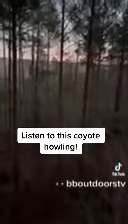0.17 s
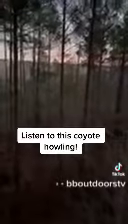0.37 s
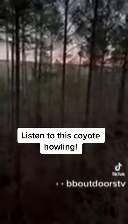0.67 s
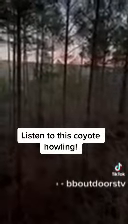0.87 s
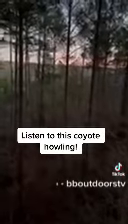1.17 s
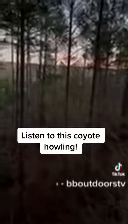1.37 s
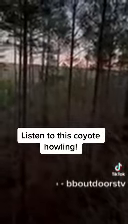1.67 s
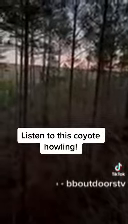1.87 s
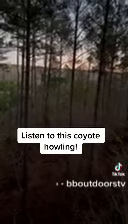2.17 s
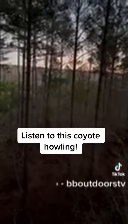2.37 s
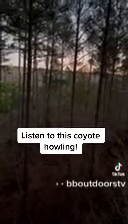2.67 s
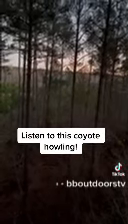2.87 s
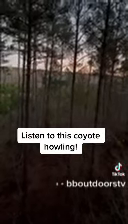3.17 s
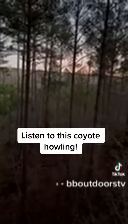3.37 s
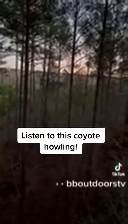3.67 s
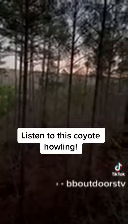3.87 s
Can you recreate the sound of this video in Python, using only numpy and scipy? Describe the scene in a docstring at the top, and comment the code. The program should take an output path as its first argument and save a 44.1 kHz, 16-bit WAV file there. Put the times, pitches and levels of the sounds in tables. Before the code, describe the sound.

A coyote holds one long, falling howl in a quiet forest, with faint bird chirps.

```python
"""A pine forest at dusk. A coyote holds one long howl, a stack of harmonics on an unsteady pitch:
a high note that breaks down to a lower register, then sinks and fades. Trunks scatter the voice
and the woods ring on behind it. Small birds chip, slur and lisp in quick, wavering sine tones.
Underneath lies a faint bed of low rumble and hiss, with a few soft, leafy rustles."""
import sys
import numpy as np
from scipy import signal
from scipy.fft import rfft, irfft, next_fast_len
from scipy.io import wavfile
from scipy.ndimage import map_coordinates

SR = 44100
rng = np.random.default_rng(int(sys.argv[2]) if len(sys.argv) > 2 else 0)


def inscribe(sig):
    """Save sig as 16-bit PCM at rate SR to the path in sys.argv[1].

    A 1-D sig is mono; a 2-D sig holds one channel per row.
    Samples are clipped to [-1, 1] before scaling.
    """
    pcm = np.round(np.clip(np.atleast_2d(sig).T, -1, 1) * 32767)
    wavfile.write(sys.argv[1], SR, pcm.astype(np.int16))


N = 176400

WOODS_DECAY = [(300, 0.41), (700, 3.43), (1500, 2.1), (2300, 2.22), (4000, 0.19), (8000, 0.6)]  # ring of the woods: f/Hz, T60/s

HOWL_PITCH = [(0.0, 749.7), (0.15, 776), (0.25, 759), (0.35, 774), (0.42, 750.5), (0.75, 731.7),
              (0.95, 744.0), (1.15, 741.4), (1.3, 749.4), (1.41, 749.1), (1.47, 731.3), (1.528, 708.9),
              (1.542, 646), (1.75, 622.2), (1.95, 616.1), (2.2, 595.2), (2.48, 582.3), (2.72, 545.3),
              (3.0, 528.7), (3.25, 486.5), (3.45, 472.5), (3.55, 477.2), (3.68, 486.8), (3.8, 481.0),
              (4.0, 479.4)]  # the howl's melody: t/s, f/Hz
HOWL_JITTER = [(0, .0045), (.4, .004), (.6, .0012), (2, .0014), (3, .0025), (3.3, .006), (3.6, .0018),
               (4, .0012)]  # unsteadiness: t/s, depth/share of the pitch
HOWL_FLUTTER = [(0, 3.4), (.52, 3), (.65, 1.2), (1.4, 1), (1.7, .4), (2.35, .4), (2.55, 1.5), (3.05, .9),
                (3.27, 2.4), (3.55, .6)]  # fast level flutter of the harmonics, at full depth on the odd ones: t/s, depth/dB
# envelopes of the six lowest harmonics: t/s, level/dB
HARMONIC_1 = [(0, -65), (.66, -67), (.88, -79), (1.02, -54.5), (1.16, -67), (1.25, -55), (1.42, -66),
              (1.56, -44.5), (1.7, -38), (1.84, -42), (1.94, -41), (2.12, -46), (2.31, -39.5), (2.41, -46),
              (2.65, -51), (3.2, -55), (3.4, -62), (4, -70)]
HARMONIC_2 = [(0, -46.5), (1.1, -46.5), (1.25, -52), (1.5, -47), (1.95, -45.5), (2.17, -56), (2.29, -60),
              (2.42, -50), (2.93, -51), (3, -57), (3.11, -46), (3.28, -56), (3.5, -50.5), (3.78, -59),
              (4, -61)]
HARMONIC_3 = [(0, -53.5), (.28, -63), (0.579, -46.5), (1.151, -53), (1.501, -50.5), (2.05, -55.5),
              (2.199, -57), (2.68, -65.5), (2.85, -61.5), (3.12, -61.5), (3.23, -78), (4, -81)]
HARMONIC_4 = [(0, -105), (1.518, -105), (1.639, -72), (2.099, -72.5), (2.35, -84.5), (2.55, -71.5),
              (2.72, -61.5), (3.199, -76), (4, -75.5)]
HARMONIC_5 = [(0, -79), (.36, -79), (0.6, -85), (1.252, -82.5), (1.597, -112), (2.5, -112), (2.72, -81.5),
              (3, -104)]
HARMONIC_6 = [(0, -73), (.36, -73), (.6, -94), (1.7, -93), (2.2, -108)]
SHEEN_ENVELOPE = [(0, -99), (.4, -98.5), (1.4, -104), (1.6, -120)]  # faint top overtones of the high note: t/s, level/dB
SHEEN_HARMONICS = [(7, -7), (10, 2), (11, 5), (13, 1), (14, -1.5)]  # their balance: harmonic number, offset/dB
RASP_ENVELOPE = [(.5, -97), (.6, -72.5), (.68, -79.5), (.84, -72), (.92, -105)]  # roughness between harmonics 2 and 3: t/s, level/dB

RUMBLE_EQ = [(20, -39.5), (40, -12.5), (68, -3.5), (105, -8), (160, -15), (300, -22.5), (600, -18),
             (1200, -40.5), (3000, -59)]  # colour of the rumble: f/Hz, relative level/dB
RUMBLE_ENVELOPE = [(0, -73.5), (1.3, -74), (1.65, -73), (1.9, -73.5), (2.6, -76.5), (3.6, -72.5), (4, -74)]  # its slow drift: t/s, level/dB
RUMBLE_BUMPS = [(1.59, -85.5), (1.66, -73), (1.75, -73), (1.87, -72.5), (3.8, -94)]  # soft bumps in it: t/s, level/dB
HISS_EQ = [(100, -2.5), (500, -3), (800, -4.5), (1200, -7.5), (3000, -26.5), (3700, -9), (5000, -14.5),
           (7000, -13), (8200, -19.5), (9000, -25), (10000, -20), (13500, -27)]  # colour of the steady hiss: f/Hz, relative level/dB
MID_HISS_EQ = [(400, -13.5), (900, 5.5), (1400, 2.5), (2200, -8), (3200, -13.5), (5000, -23.5), (8000, -30)]  # colour of the midrange hiss: f/Hz, relative level/dB
MID_HISS_ENVELOPE = [(0, -84.5), (1.3, -87), (1.7, -99.5), (2.4, -92), (2.9, -78.5), (3.25, -80.5),
                     (4, -78.5)]  # its dip and swell: t/s, level/dB

CHIP_CUES = [(.032, -59, 6120), (0.426, -63.5, 6790), (1.61, -64.5, 6270), (2.124, -67.5, 6590),
             (2.746, -58.5, 5970), (3.257, -54.5, 6200), (3.794, -52, 6000)]  # sharp bird chips: t/s, dry peak level/dB, bottom f/Hz
SLUR_CUES = [(.09, -84, 6050), (.3, -84, 5850), (.715, -85.5, 5520), (1.99, -87.5, 6080)]  # falling bird notes: t/s, dry peak level/dB, starting f/Hz
LISP_CUES = [(0.774, 0.099, -77.5, 7160), (0.81, 0.049, -80, 6900), (2.118, 0.057, -75, 7030),
             (2.582, 0.055, -69, 7520), (2.645, 0.032, -71.5, 7650), (2.687, 0.036, -82, 7650),
             (2.954, .05, -82, 7670)]  # thin, buzzy bird notes: t/s, length/s, dry level/dB, f/Hz
RUSTLE_CUES = [(2.379, -80.5), (2.459, -76.5), (3.935, -78.5)]  # soft rustles: t/s, peak level/dB
RUSTLE_EQ = [(1500, -34), (2900, -10), (3600, 6.5), (4400, -10.5), (5500, -14.5), (7500, -26),
             (10000, -27.5)]  # their colour: f/Hz, relative level/dB


def amp(db):
    """Decibels to gain."""
    return 10 ** (np.asarray(db) / 20)


def along(points, hz):
    """Read (f/Hz, value) breakpoints on a log frequency axis."""
    f, v = np.transpose(points)
    return np.interp(np.log(hz + 1), np.log(f + 1), v)


def curve(points, t):
    """Join (t/s, value) breakpoints with straight lines."""
    return np.interp(t, *np.transpose(points))


def wobble(rate, t):
    """Smooth random modulation, `rate` knots a second."""
    at = (t - t[0]) * rate
    return map_coordinates(rng.standard_normal(8192), [at], mode="wrap")


def swells(cues, t, sigma_s):
    """A gain envelope with a bell-shaped swell at each (t/s, level/dB) cue."""
    return sum(amp(db) * np.exp(-.5 * ((t - s) / sigma_s) ** 2) for s, db in cues)


def tone(hz):
    """A sine that follows a pitch contour."""
    return np.sin(2 * np.pi * np.cumsum(hz) / SR)


def filtered(x, response):
    """Equalise x with a gain given as a function of frequency."""
    size = next_fast_len(N + SR // 2)
    return irfft(rfft(x, size) * response(np.fft.rfftfreq(size, 1 / SR)), size)[:N]


def noise(eq):
    """Coloured noise of rms 1."""
    x = filtered(rng.standard_normal(N), lambda hz: amp(along(eq, hz)))
    return x / x.std()


def add(track, s, sound):
    """Mix a sound in at time s."""
    part = track[max(0, round(s * SR)):][:len(sound)]
    part += sound[:len(part)]


def forest(x, trunks_db, trunks_t60, woods_db):
    """Direct sound, a quick scatter off near trunks and the long ring of the woods."""
    hz, s, spectrum = signal.stft(rng.standard_normal(2 * SR), SR, nperseg=256)
    decay = amp(-60 * s / along(WOODS_DECAY, hz)[:, None])
    tail = signal.istft(spectrum * decay, SR, nperseg=256)[1]
    t = np.arange(len(tail)) / SR
    tail *= 1 - np.exp(-t / .013)  # the ring eases in
    scatter = rng.standard_normal(len(t)) * amp(-60 * t / trunks_t60)
    woods = amp(woods_db) * tail / np.linalg.norm(tail)
    trunks = amp(trunks_db) * scatter / np.linalg.norm(scatter)
    return x + signal.fftconvolve(x, woods + trunks)[:len(x)]


def coyote():
    """Harmonics on one unsteady pitch, each with its own swell and flutter, and a brief rasp."""
    lead_in = SR  # the howl is already under way
    t = np.arange(-lead_in, N) / SR
    hz = curve(HOWL_PITCH, t) * (1 + curve(HOWL_JITTER, t) * wobble(100, t))
    phase = 2 * np.pi * np.cumsum(hz) / SR
    envelopes = [HARMONIC_1, HARMONIC_2, HARMONIC_3, HARMONIC_4, HARMONIC_5, HARMONIC_6]
    levels = {k: curve(points, t) for k, points in enumerate(envelopes, 1)}
    levels.update({k: curve(SHEEN_ENVELOPE, t) + db for k, db in SHEEN_HARMONICS})
    voice = np.zeros(len(t))
    for k, db in levels.items():
        depth_db = curve(HOWL_FLUTTER, t) * (1 if k % 2 else .45)  # even harmonics are steadier
        flutter_db = depth_db * wobble(80, t)
        shimmer_db = 1.3 * wobble(24, t)
        voice += amp(db + shimmer_db + flutter_db) * np.sin(k * phase)
    rasp = amp(curve(RASP_ENVELOPE, t)) * wobble(110, t) * np.sin(2.5 * phase)
    return forest(voice + rasp, trunks_db=-15, trunks_t60=.3, woods_db=-17)[lead_in:]


def air():
    """The bed: an uneven, bumpy rumble, a steady hiss and a midrange hiss that comes up late."""
    t = np.arange(N) / SR
    sway_db = 1.2 * wobble(7.7, t)
    bumps = swells(RUMBLE_BUMPS, t, sigma_s=.031)
    rumble = (amp(curve(RUMBLE_ENVELOPE, t) + sway_db) + bumps) * noise(RUMBLE_EQ)
    hiss = amp(-80) * noise(HISS_EQ)
    mid_hiss = amp(curve(MID_HISS_ENVELOPE, t)) * noise(MID_HISS_EQ)
    return rumble + hiss + mid_hiss


def bird_chips():
    """Each chip swoops down and back up very fast, loudest at the bottom."""
    top_hz, length_s, peak_s, shoulder = 7460, .019, .0094, amp(-9)
    track, t = np.zeros(N), np.arange(SR // 2) / SR
    envelope = np.interp(t, [0, .002, .73 * peak_s, peak_s, .76 * length_s, length_s],
                         [0, shoulder, shoulder, 1, shoulder, 0])
    for s, db, bottom_hz in CHIP_CUES:
        swoop_hz = np.interp(t, [0, peak_s, .72 * length_s], [top_hz, bottom_hz, top_hz])
        waver = 1 + .069 * np.tanh(wobble(900, t))
        chip = amp(db) * envelope * tone(swoop_hz * waver)
        add(track, s, forest(chip, trunks_db=1, trunks_t60=.22, woods_db=-10))
    return track


def bird_slurs():
    """A distant bird lets short hoarse notes fall, blurred by the trees."""
    length_s, fall_hz_per_s = .029, 18000
    track, t = np.zeros(N), np.arange(SR // 8) / SR
    envelope = np.sin(np.pi * np.minimum(t / length_s, 1))
    for s, db, start_hz in SLUR_CUES:
        glide_hz = start_hz - fall_hz_per_s * t
        waver = 1 + .045 * wobble(700, t)
        add(track, s, amp(db) * envelope * tone(glide_hz * waver))
    return forest(track, trunks_db=5, trunks_t60=.16, woods_db=-4)


def bird_lisps():
    """Faint birds hold short, thin notes that buzz with a fast waver in pitch."""
    fade_s = .002
    track, t = np.zeros(N), np.arange(SR // 2) / SR
    for s, length_s, db, hz in LISP_CUES:
        waver = 1 + .06 * np.tanh(2 * wobble(600, t))
        envelope = np.clip(np.minimum(t, length_s - t) / fade_s, 0, 1)
        add(track, s, amp(db) * envelope * tone(hz * waver))
    return forest(track, trunks_db=-4, trunks_t60=.23, woods_db=-19)


def rustles():
    """Short soft swells of noise, like dry leaves stirring."""
    t = np.arange(N) / SR
    return swells(RUSTLE_CUES, t, sigma_s=.011) * noise(RUSTLE_EQ)


def scene():
    """The mono mix: howl up front, birds and leaves behind, evening air underneath."""
    return (coyote() + bird_chips() + bird_lisps() + bird_slurs() + rustles() + air())[None]


def record(dry):
    """A brick-wall low-pass on the whole mix."""
    return filtered(dry[0], lambda hz: hz < 13750)[None]


dry = scene()
out = record(dry)
inscribe(out)
```